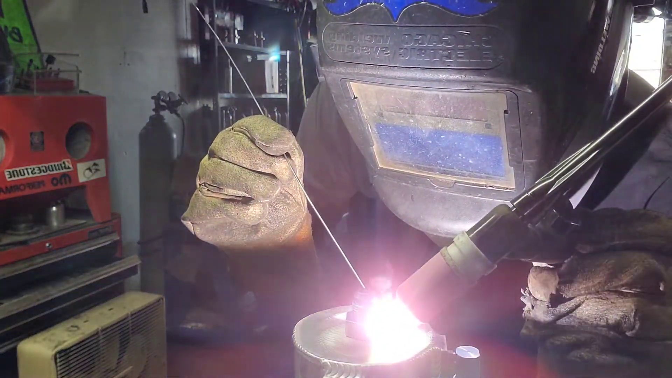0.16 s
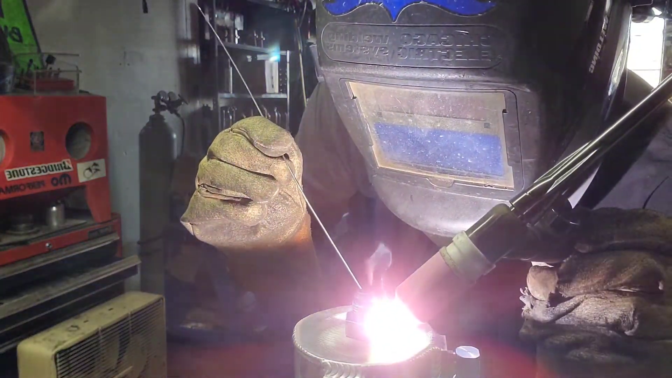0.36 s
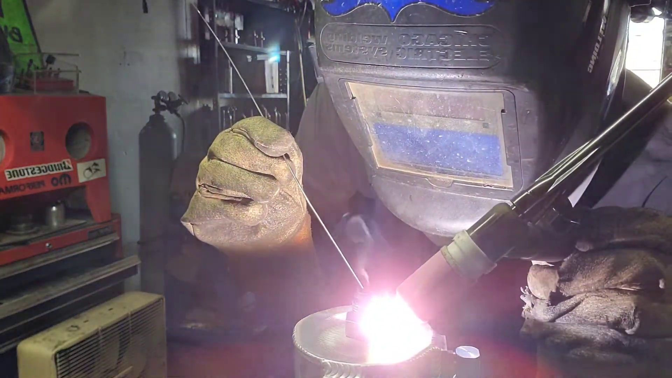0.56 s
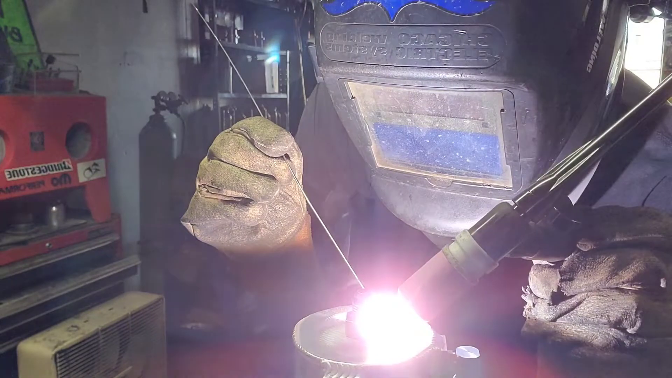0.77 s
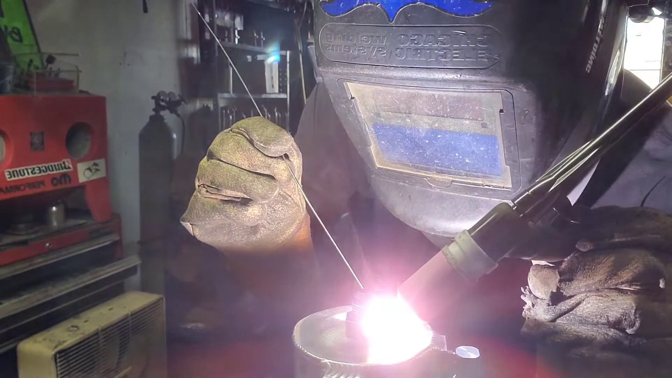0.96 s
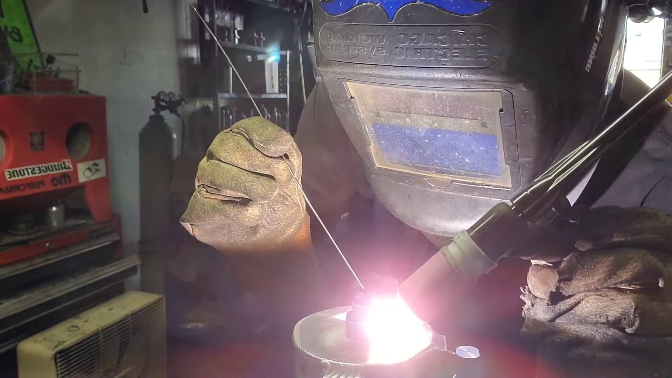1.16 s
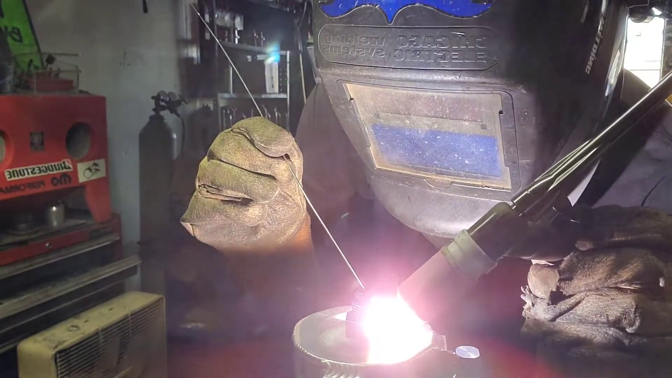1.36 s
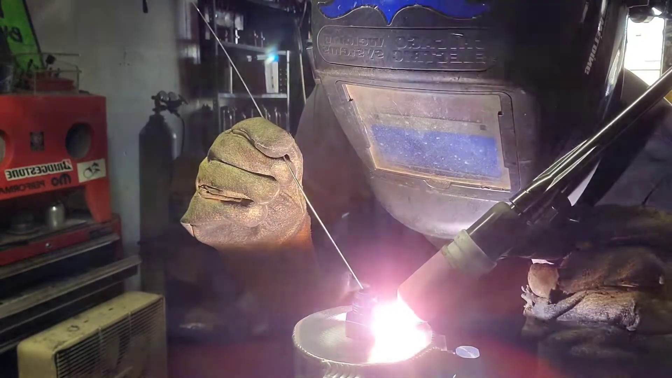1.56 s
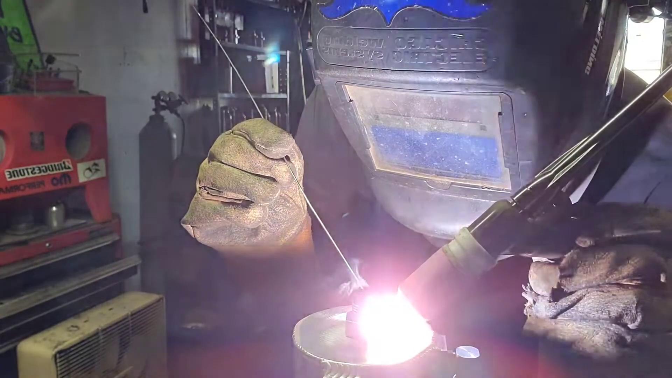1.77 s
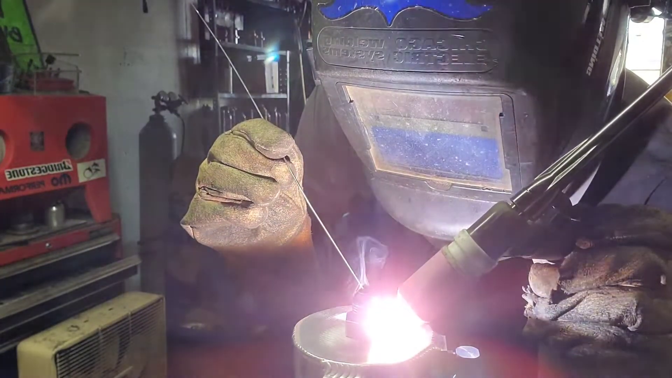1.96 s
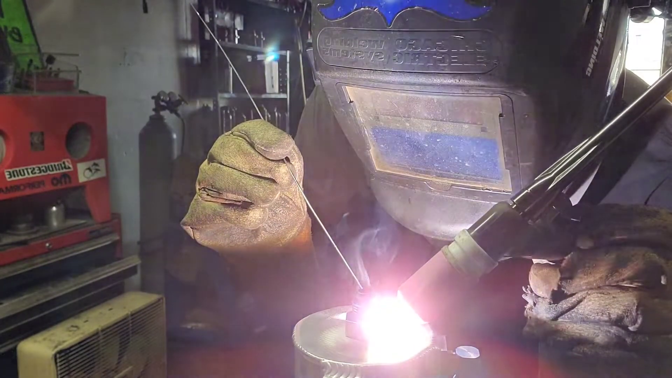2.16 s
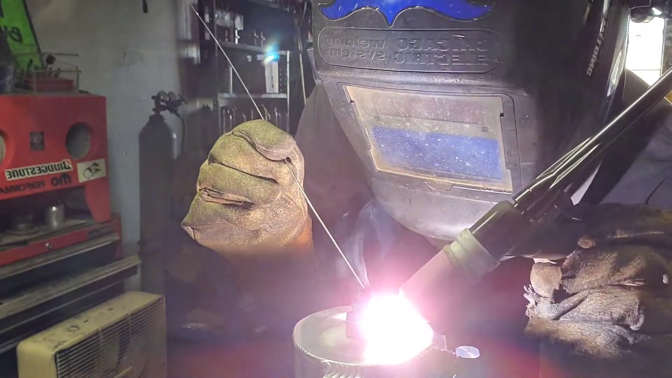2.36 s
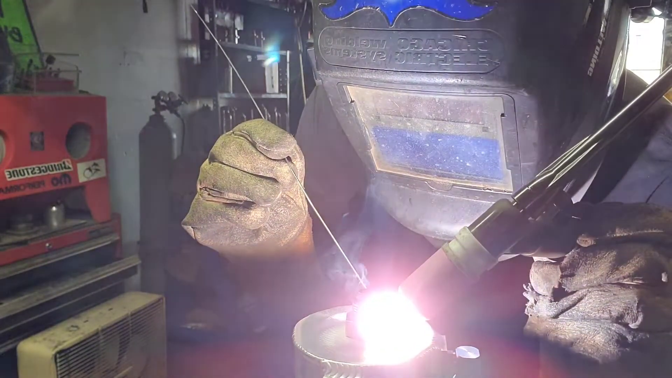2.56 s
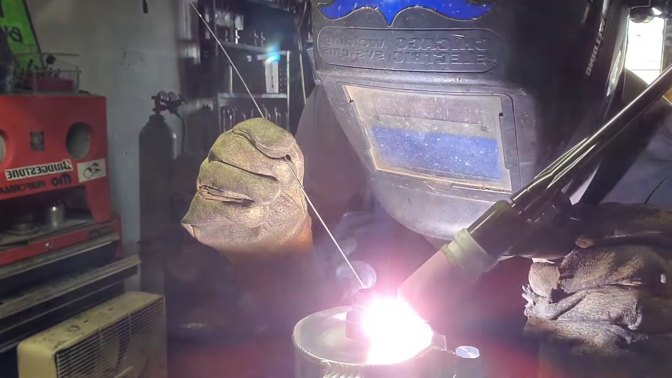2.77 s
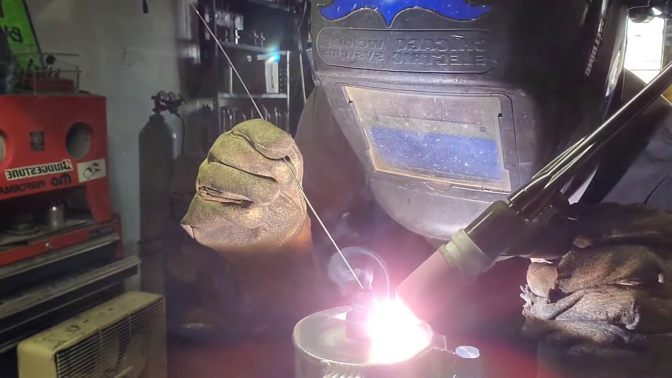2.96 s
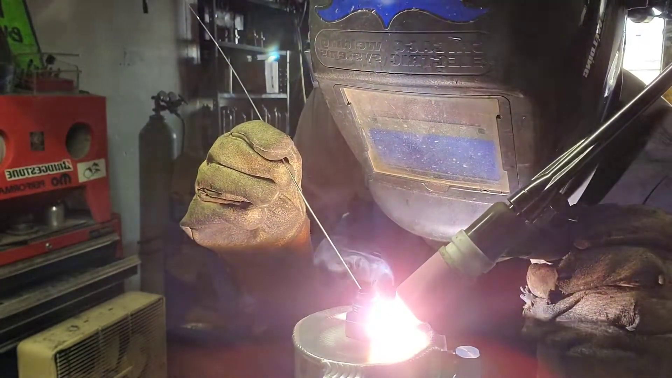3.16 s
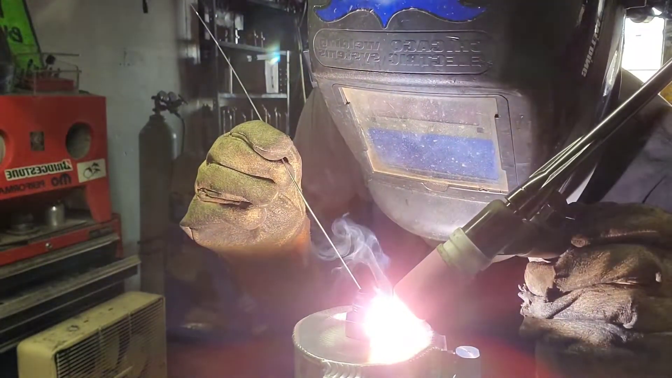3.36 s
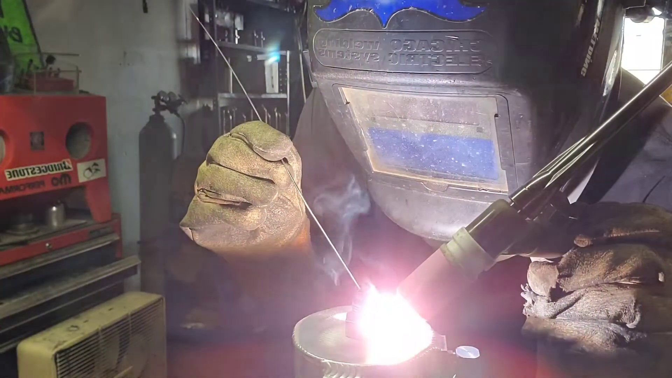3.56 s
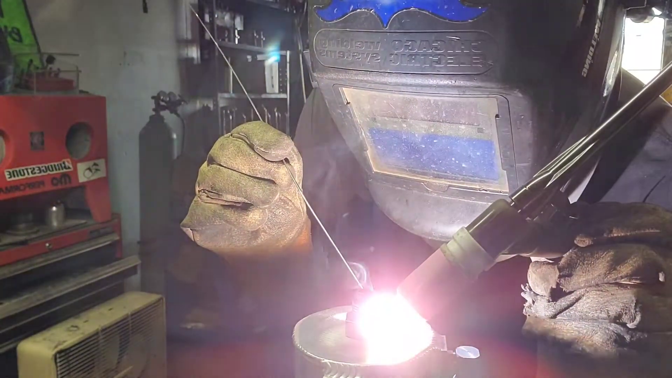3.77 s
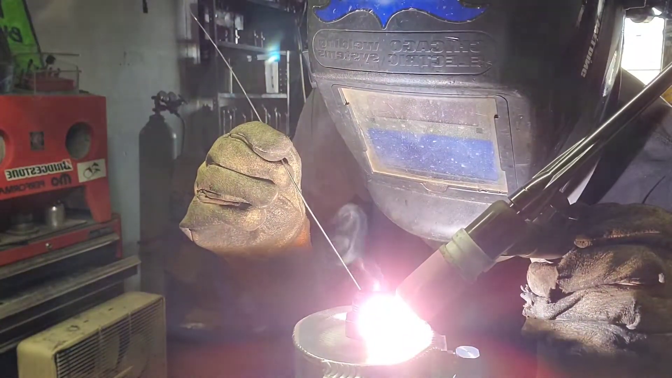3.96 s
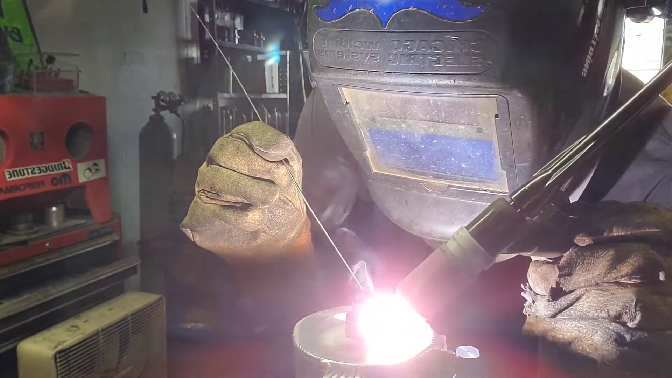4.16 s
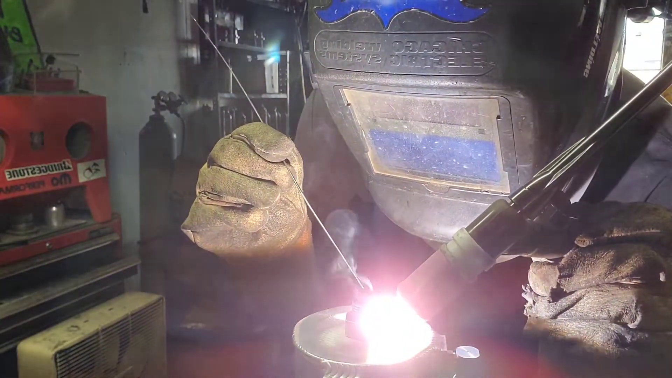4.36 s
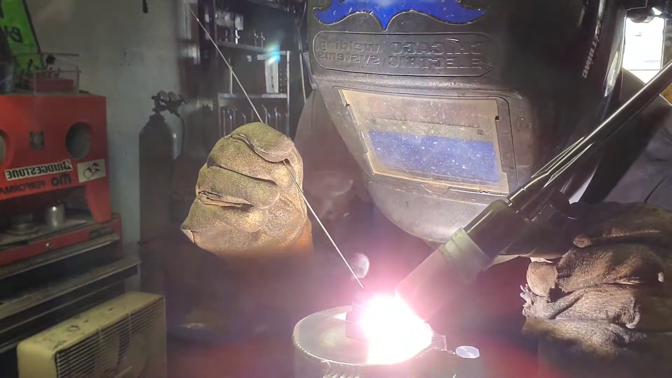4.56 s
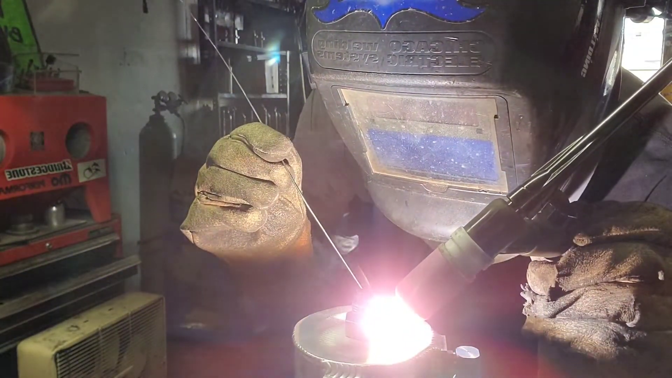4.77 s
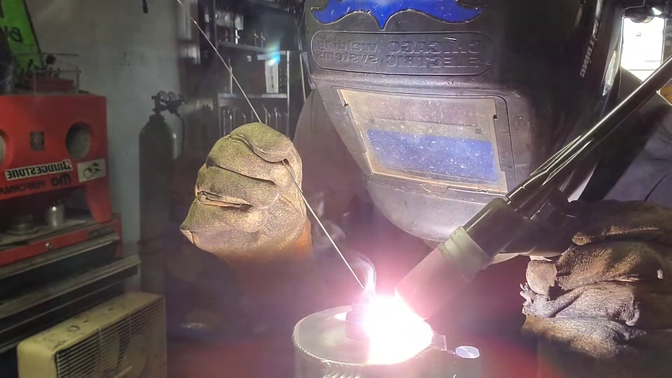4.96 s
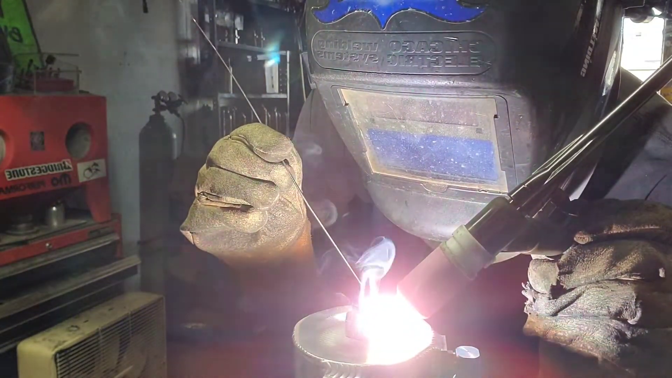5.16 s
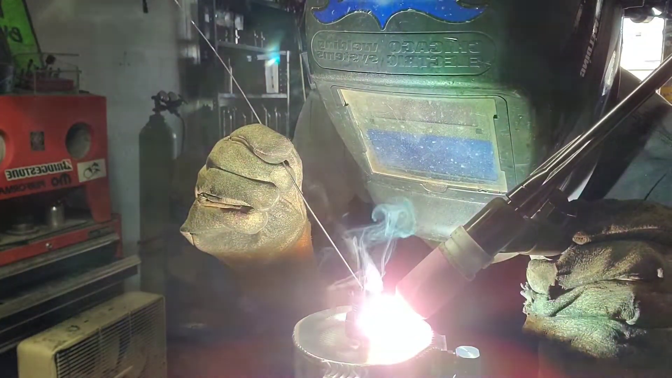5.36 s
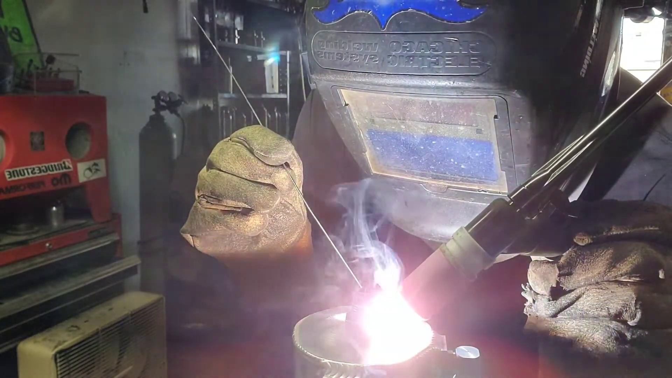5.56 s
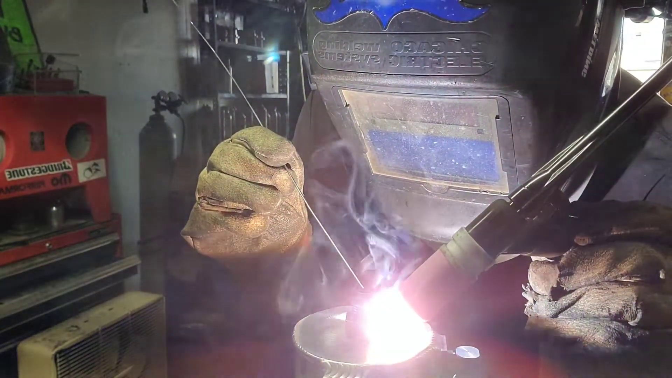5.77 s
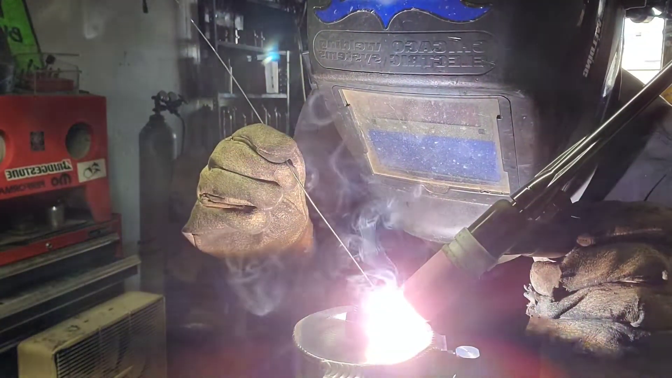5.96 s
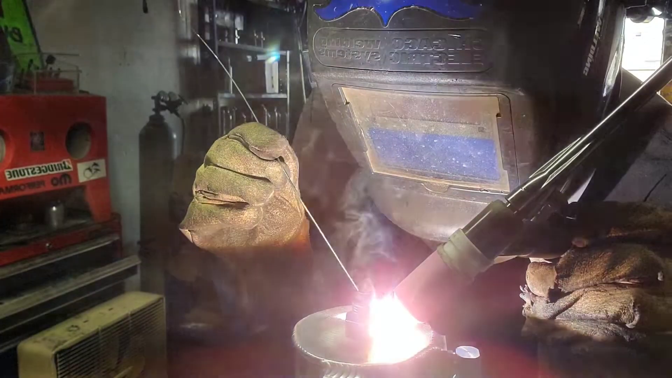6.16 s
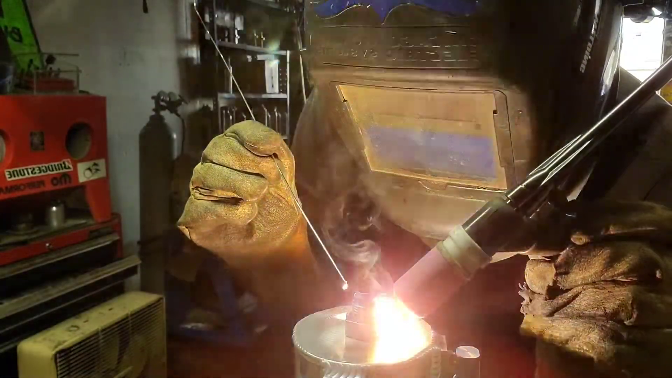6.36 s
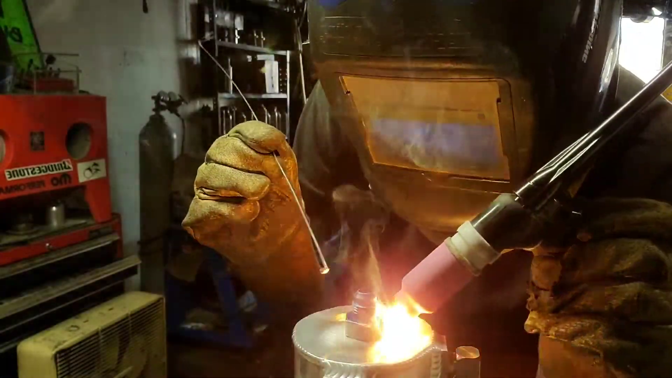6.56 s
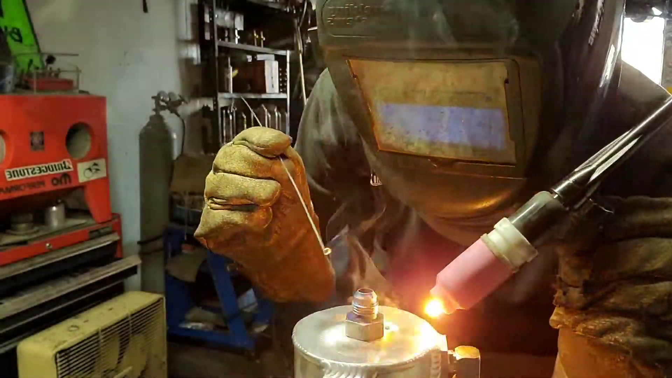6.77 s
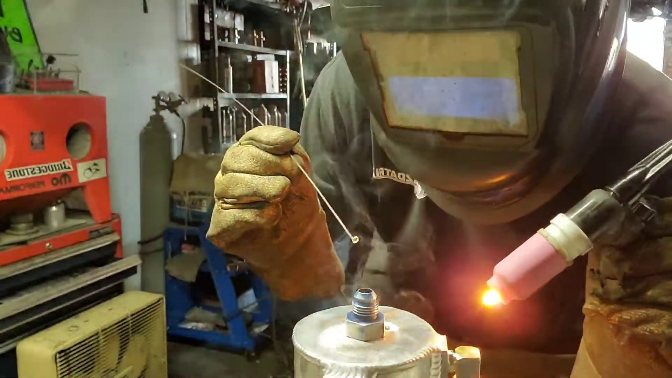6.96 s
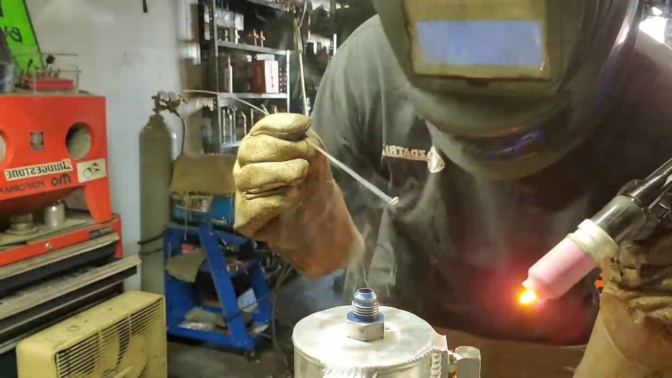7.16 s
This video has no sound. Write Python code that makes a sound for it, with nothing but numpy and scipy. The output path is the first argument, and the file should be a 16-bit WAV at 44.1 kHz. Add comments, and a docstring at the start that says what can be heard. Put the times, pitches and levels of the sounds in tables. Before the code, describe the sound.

Close-up in a small, fairly dry workshop, an electric arc is already buzzing, its even low drone edged with metallic rasp, crisp ticking treble and frying sizzle. Level and tone drift gently, with short dips and flares. After more than five seconds it turns rough and crackly, recovers, then cracks and goes out suddenly. The short echo fades, uncovering faint gas hiss, a soft high whistle and barely audible machine hum.

```python
"""Workshop: an alternating-current TIG arc burns on aluminium while filler rod is fed in.
Each cycle holds two current reversals: one strikes with a tick and a rasp, the other gives a low push.
Filtered pulse trains make ticks, push and clicks; noise bursts at each strike roughen rasp and sizzle.
Late on the arc sputters, cracks as the torch lifts and goes out; filtered-noise gas, a faint whistle
and a hum of sines remain."""
import sys
import numpy as np
from scipy import signal
from scipy.fft import rfft, irfft, next_fast_len
from scipy.io import wavfile
from scipy.ndimage import uniform_filter1d

SR = 44100
rng = np.random.default_rng(int(sys.argv[2]) if len(sys.argv) > 2 else 0)


def wav_out(sig):
    """Save sig, one row per channel (or a flat mono array), as 16-bit PCM at SR to the path in sys.argv[1]."""
    wavfile.write(sys.argv[1], SR, np.round(np.clip(np.atleast_2d(sig).T, -1, 1) * 32767).astype(np.int16))


N = 317949
TIME = np.arange(N) / SR  # s
BINS_HZ = np.fft.rfftfreq(4096, 1 / SR)

ARC_HZ, FIRST_STRIKE_S, ARC_OUT_S = 130.329, 0.00395, 6.453
PUSH_LAG_S = 0.00232  # strike to opposite reversal
RASP_LEAD_S = 0.00069  # current collapses just before each strike
PUSH_RING_HZ, RASP_RING_HZ = (375, 22), (1400, 150)  # all-pass centre, width
LIFT_S, LIFT_RISE_S, LIFT_FALL_S, LIFT_DB = 6.428, 0.05, 0.028, 8.5  # arc stretches as torch lifts
WANDER_PER_S = 14  # random gain steps per second
CLICK_DB, CLICK_ECHO_DB, BURST_DB, BURST_ECHO_DB = -4, -2.5, -10, -8.5  # sizzle mix, before trim
SHIMMER_DB, SHIMMER_HZ, SHIMMER_S = 1.5, 170, 0.1  # depth, smoothing width, smoothing length
CRACK_NEAR_DB, CRACK_FAR_DB = -14, -8  # echo mix
BODY_ROOM_DB, TREBLE_ROOM_DB = -17.5, -11  # room sends
BASS_SIDE_DB = -13  # side noise relative to mid
GAS_DB, MOTOR_HZ, MOTOR_DB = -51, 120, -83
PORT_LAG_SAMPLES = 3  # right after left
EDGE_HZ = 15620

# Burning arc, drifting as the torch travels: t/s, relative buzz, sizzle, tick level/dB
ARC_LEVELS = [(0.0, -38, -44.5, -27), (0.3, -42, -42.5, -27), (0.582, -36, -41.5, -26),
              (0.784, -35.5, -39, -27), (1.452, -37.5, -42, -27), (1.85, -40, -42, -25.7),
              (2.499, -41.5, -39.5, -26.5), (2.648, -35.5, -39.5, -25.5), (3.081, -41, -39, -25.5),
              (3.275, -44.5, -44, -28.5), (3.719, -40.5, -38, -24.5), (4.179, -36, -41.5, -27.5),
              (4.623, -37.5, -40.5, -26), (5.18, -36.5, -40, -25), (5.56, -38.5, -39, -26),
              (5.72, -44, -37, -27), (5.855, -45, -37, -26.5), (5.93, -45, -40.5, -29.5),
              (6.017, -38.5, -40.5, -26.5), (6.3, -42.5, -42.5, -27.5), (6.45, -40, -40.5, -28.5)]
# Plasma restlessness: t/s, relative flutter level/dB
FLUTTER_LEVELS = [(0.0, -74), (3.17, -74), (3.3, -70.5), (3.42, -72.5), (5.25, -75.5), (5.7, -66.5),
                  (5.92, -62.5), (5.99, -73), (6.33, -82), (6.44, -67)]
# Runs of hard re-ignitions: start t/s, end t/s, first and last level/dB before trim, treble shelf/dB
SPUTTER_RUNS = [(5.632, 5.716, -30, -29, 15), (5.716, 5.740, -30, -29, 3), (5.770, 5.776, -23, -29, 16),
                (5.796, 5.832, -28, -28, 3), (5.839, 5.855, -31.5, -27, 27), (5.862, 5.885, -23, -34, 28),
                (5.885, 5.908, -30, -28, 8), (5.908, 5.916, -25, -26, 3), (5.913, 5.931, -28, -34, 7),
                (6.353, 6.391, -30, -37, 15), (6.391, 6.428, -46, -26, -15), (6.430, 6.456, -28, -32, -18)]
# Stalls weaken the regular strikes (negative: strengthen): start t/s, end t/s, full depth/dB
STALL_SPANS = [(5.71, 5.740, 2.5), (5.740, 5.771, 5), (5.772, 5.794, 9), (5.8, 5.863, 3),
               (5.863, 5.935, -1.5)]
# Push overtones: multiple of arc rate, relative level/dB
PUSH_OVERTONES = [(1, -25), (2, -8), (3, -9.5), (4, -9), (5, 1.67), (6, -6.5), (7, -8.5), (8, -9.5),
                  (9, -15), (11, -37), (16, -31.5)]
# Rasp overtones: multiple of arc rate, relative level/dB
RASP_OVERTONES = [(1, -64), (9, -17), (10, -4), (11, 5.5), (12, 2), (13, 5.5), (14, 3.5), (15, -9.5),
                  (17, -17.5), (34, -34.5)]
# Buzz phase lead, left over right: multiple of arc rate, phase/rad
BUZZ_LEADS = [(2, 0), (3, 0.45), (4, 0.1), (6, 0.46), (7, 2.04), (8, 0.11), (9, 1.54), (10, 0), (14, 0.68)]
# Tick spectrum: f/Hz, relative level/dB
TICK_SPECTRUM = [(100, -114), (6000, -22), (8200, -33), (8900, -11.5), (9900, -4.5), (10500, -12),
                 (11100, -1.5), (11500, -2), (12000, 6), (13000, -3.5), (13500, 3.5), (13900, -2),
                 (14800, -8), (15200, 4), (15700, -1)]
# Oxide click spectrum: f/Hz, relative level/dB
CLICK_SPECTRUM = [(100, -45.5), (1400, -7), (2100, -3), (2550, 5), (2950, -1), (3400, 0.5), (3750, -2.5),
                  (4200, 3.5), (4650, -3), (5300, 3), (7200, 3), (8200, 1), (9800, 7), (15300, -3)]
# Sizzle burst spectrum: f/Hz, relative level/dB
BURST_SPECTRUM = [(100, -67), (1400, -24), (2000, 4), (2500, 5.5), (3400, 1.5), (4650, 4.5), (5400, 8),
                  (7200, 3.5), (8200, 2), (9800, -1), (12000, -30), (15300, -18)]
# Re-ignition crack spectrum: f/Hz, relative level/dB
CRACK_SPECTRUM = [(30, -26), (100, -29), (250, -13), (650, -0.5), (1100, -9.5), (1600, 6.5), (2600, 1.5),
                  (3600, -2.5), (5500, -2), (8500, -2), (12000, 4), (15500, 1)]
# Plasma flutter spectrum: f/Hz, relative level/dB
PLASMA_SPECTRUM = [(20, -10), (80, 0.5), (130, 1), (190, -3.5), (330, 0), (460, -5.5), (680, 3.5),
                   (1000, -3.5), (1400, 4.5), (3000, -11.5)]
# Shielding gas spectrum: f/Hz, relative level/dB
GAS_SPECTRUM = [(140, -34), (350, -43), (520, -32), (950, -16.5), (1250, -27), (1500, -3), (2850, -13.5),
                (3600, -5.5), (4100, -15), (4800, -18.5), (5800, -8.5), (7200, -10), (9500, -19),
                (15500, -11.5)]
# Shop rumble spectrum: f/Hz, relative level/dB
RUMBLE_SPECTRUM = [(20, -19), (45, 8), (90, -3), (130, -21), (200, -13), (330, -35), (600, -39)]
# Gas resonances in the torch cup: f/Hz, half-width to -6 dB/Hz, level/dB
CUP_RESONANCES = [(1540, 320, -66.5), (2334, 47, -58.5), (2540, 53, -63), (2670, 180, -58),
                  (3280, 140, -65), (5800, 210, -84)]
# Machine hum: t/s, level/dB before trim
HUM_LEVELS = [(0.0, -75), (0.58, -60.5), (2.15, -56), (2.63, -72), (3.07, -58), (4.37, -68.5), (4.99, -89),
              (5.92, -66.5), (6.06, -70), (6.44, -71), (7.04, -86), (7.2, -74)]
# Machine hum tones: f/Hz, relative level/dB
HUM_TONES = [(64.8, 3), (129.4, -6), (194, -36)]
# Workshop decay: f/Hz, T60/s
ROOM_DECAY = [(100, 0.062), (600, 0.36), (2000, 0.34), (8000, 0.12), (15000, 0.022)]
# Tick tilt, left minus right, before trim: f/Hz, relative level/dB
TICK_TILT = [(7500, -4.5), (8900, 4), (9900, 1.5), (11300, -13), (12100, 3), (12800, -18.5), (14200, 15),
             (15200, 0.5)]
# Gas jet whistle, end values held outside: t/s, f/Hz, level/dB
WHISTLE_GLIDE = [(6.45, 6350, -66), (6.699, 6600, -67), (6.85, 6960, -60), (7.05, 6940, -59),
                 (7.2, 6700, -68)]
# Soft puffs as the arc lurches: onset t/s, envelope peak/dB, f/Hz
PUFF_EVENTS = [(1.15, -54, 170), (1.575, -51, 191), (3.57, -48, 75), (4.945, -57, 180), (5.514, -48, 200),
               (5.702, -52, 119), (5.726, -49, 85), (5.766, -47, 80), (5.795, -50, 85), (5.827, -51, 75),
               (5.866, -48, 85), (5.908, -50, 108)]
# Arc choked, as when the rod dips into the pool (negative: a rise), depth scaled per layer:
# t/s, depth/dB, closing/s, recovery/s
ROD_DIPS = [(0.741, 3, 0.021, 0.0098), (1.622, 6.5, 0.037, 0.071), (2.136, 5.5, 0.061, 0.031),
            (3.152, 2.5, 0.061, 0.029), (4.987, 3, 0.036, 0.068), (5.753, -0.5, 0.019, 0.035),
            (6.295, 3.5, 0.2, 0.063)]
# Flares as the arc meets oxide or stretches, rise scaled per layer: t/s, rise/dB, half-length/s
ARC_FLARES = [(1.126, 2, 0.016), (1.505, 1.8, 0.085), (1.943, 1.5, 0.042), (3.288, 4, 0.064),
              (3.838, 1.5, 0.04), (5.112, 1.5, 0.096), (5.346, 2.5, 0.067), (5.55, 2, 0.032),
              (6.155, 3.5, 0.045), (6.417, 0.5, 0.056)]


def amp(db):
    """Decibels to gain."""
    return 10 ** (np.asarray(db) / 20)


def evened(x):
    """Scale to rms 1."""
    return x / np.sqrt(np.mean(x ** 2) + 1e-20)


def read(points, hz):
    """Interpolate a table on a log-frequency axis."""
    f, value = np.transpose(points)
    return np.interp(np.log(hz + 1), np.log(f + 1), value)


def follow(rows, axis=1):
    """Gain over time from one dB column."""
    rows = np.asarray(rows)
    return amp(np.interp(TIME, rows[:, 0], rows[:, axis]))


def convolve(x, response):
    """Convolve with one or two responses, cut to N."""
    return signal.oaconvolve(np.atleast_2d(x), np.atleast_2d(response), axes=1)[:, :N]


def colour(x, db):
    """Minimum-phase filter of unit energy, shaped by dB at BINS_HZ."""
    log_gain = np.log(amp(np.concatenate([db, db[-2:0:-1]])))
    response = np.fft.ifft(np.exp(np.conj(signal.hilbert(log_gain)))).real
    return convolve(x, response / np.linalg.norm(response))


def pulses(times, sizes, order=12):
    """Windowed sincs at sub-sample times; size 1 at the arc rate gives rms 1."""
    at = times[:, None] * SR
    index = at.astype(int) + np.arange(-order, order + 1)
    window = np.cos(np.pi * (index - at) / (2 * order + 2)) ** 2
    shape = np.sinc(index - at) * window
    slots = np.clip(index, 0, N - 1).ravel()
    return np.bincount(slots, (sizes[:, None] * shape).ravel(), N) * np.sqrt(SR / ARC_HZ)


def reversals(lag_s, spread_db, jitter_us, upset=0.2):
    """One pulse a cycle; size and timing scatter scale with plasma flutter."""
    times = np.arange(FIRST_STRIKE_S, ARC_OUT_S, 1 / ARC_HZ) + lag_s
    s, db = np.transpose(FLUTTER_LEVELS)
    scatter = amp(upset * np.interp(times, s, db - db[0]))
    size, shift = rng.standard_normal((len(times), 2)).T * scatter
    return evened(pulses(times + jitter_us * 1e-6 * shift, amp(spread_db * size)))


def scour(steady, burst_s):
    """Noise that flares just after every strike and decays over burst_s."""
    age = (TIME - FIRST_STRIKE_S) % (1 / ARC_HZ)
    envelope = steady + np.exp(-age / burst_s)
    return evened(envelope * rng.standard_normal(N) * (TIME < ARC_OUT_S))


def swell(s, rise_s, fall_s):
    """Gaussian-sided bump of height 1 at s."""
    return np.exp(-((TIME - s) / np.where(TIME < s, rise_s, fall_s)) ** 2)


def unrest(dip, flare, wander_db):
    """Layer gain: its share of dips and flares, plus random wavering."""
    choked = sum(db * swell(s, closing, recovery) for s, db, closing, recovery in ROD_DIPS)
    flared = sum(db * swell(s, length, length) for s, db, length in ARC_FLARES)
    steps = rng.standard_normal(256)
    wander = np.interp(TIME * WANDER_PER_S, np.arange(len(steps)), steps)
    return amp(flare * flared - dip * choked + wander_db * wander)


def stalls(share):
    """Gain of the regular strikes while the arc stalls."""
    depth_db = sum(db * ((TIME > start) & (TIME < end)) for start, end, db in STALL_SPANS)
    return amp(-share * depth_db)


def linger(x, hz, width_hz):
    """All-pass resonance: delays sound near hz without changing its level."""
    r = np.exp(-np.pi * width_hz / SR)
    poles = [1, -2 * r * np.cos(2 * np.pi * hz / SR), r * r]
    return signal.lfilter(poles[::-1], poles, x)


def ports(x):
    """Two channels, right delayed: the arc is heard slightly earlier on the left."""
    x = np.ravel(x)
    return np.array([x, np.pad(x, (PORT_LAG_SAMPLES, 0))[:N]])


def air(side_db):
    """Stereo white noise of a given width, rms 1."""
    mid, side = rng.standard_normal((2, N))
    return evened(np.array([mid + amp(side_db) * side, mid - amp(side_db) * side]))


def bench(x, near_db, far_db, near_t60=0.0012, far_t60=0.11, count=7):
    """Echoes off workpiece (near), helmet and bench (far); patterns crossfade as the torch moves."""
    t = np.arange(SR // 6) / SR
    out = ports(x)
    for k in range(count):
        near, far = rng.standard_normal((2, 2, len(t))) * (t > 0.0003)
        near *= amp(-60 * t / near_t60)
        far *= amp(-60 * t / far_t60) * (rng.random(far.shape) < 0.12)  # sparse
        echoes = (amp(near_db) * evened(near) + amp(far_db) * evened(far)) / np.sqrt(len(t))
        progress = TIME / ARC_OUT_S * (count - 1)
        pose = np.cos(np.pi / 2 * np.clip(progress - k, -1, 1))
        out = out + convolve(x * pose, echoes)
    return out / np.sqrt(1 + amp(near_db) ** 2 + amp(far_db) ** 2)


def shimmer(x, depth_db, patch_hz, patch_s):
    """Smoothed random gain over time and frequency: bright bands come and go."""
    z = signal.stft(x, SR, nperseg=1024)[2]
    field = rng.standard_normal(z.shape)
    for _ in range(2):
        field = uniform_filter1d(field, max(1, round(patch_hz * 1024 / SR)), axis=1)
        field = uniform_filter1d(field, max(1, round(patch_s * SR / 512)), axis=2)
    gain = evened(amp(depth_db * evened(field)))
    return signal.istft(z * gain, SR, nperseg=1024)[1][:, :N]


def standing(x):
    """Standing waves shift each buzz overtone differently between the ears."""
    size = next_fast_len(N + SR)
    lead_rad = read(np.array(BUZZ_LEADS) * [ARC_HZ, 1], np.fft.rfftfreq(size, 1 / SR))
    turn = np.exp(0.5j * lead_rad)
    return irfft(rfft(x, size) * np.array([turn, turn.conj()]), size)[:, :N]


def buzz(rough=0.15):
    """Plasma column swells and shrinks at each reversal: ringing rasp at the strike, push after it."""
    push_db = read(np.array(PUSH_OVERTONES) * [ARC_HZ, 1], BINS_HZ)
    rasp_db = read(np.array(RASP_OVERTONES) * [ARC_HZ, 1], BINS_HZ)
    drift = follow(ARC_LEVELS, axis=1)
    lift = amp(LIFT_DB * swell(LIFT_S, LIFT_RISE_S, LIFT_FALL_S))

    push = colour(reversals(PUSH_LAG_S, spread_db=0.79, jitter_us=4.1, upset=0.31), push_db)
    push = evened(linger(push, *PUSH_RING_HZ))
    push = push * drift / lift * unrest(dip=1.4, flare=0, wander_db=1.12)

    noise = scour(steady=1.0, burst_s=0.0062)
    strike = rough * noise + (1 - rough) * reversals(-RASP_LEAD_S, spread_db=0.3, jitter_us=4.0)
    rasp = colour(strike * stalls(share=0.76), rasp_db)
    rasp = evened(linger(rasp, *RASP_RING_HZ))
    rasp = rasp * evened(drift) * lift * unrest(dip=1.5, flare=0.1, wander_db=1.06) * amp(-41.5)
    return standing(push + rasp) * amp([[0.35], [-0.35]])


def ticks():
    """Each strike snaps brightly, so evenly that the treble is a comb of sharp lines."""
    strike = reversals(0, spread_db=1.0, jitter_us=3.2, upset=0.4)
    snap = colour(strike * stalls(share=0.9), read(TICK_SPECTRUM, BINS_HZ))
    snap = snap * follow(ARC_LEVELS, axis=3) * unrest(dip=0.65, flare=0.7, wander_db=0.5)
    echoed = bench(snap, near_db=2.5, far_db=5.5, near_t60=0.02, count=7)
    left, right = shimmer(echoed, SHIMMER_DB, SHIMMER_HZ, SHIMMER_S)
    lean_db = read(TICK_TILT, BINS_HZ) / 2
    return np.vstack([colour(left, lean_db), colour(right, -lean_db)]) * amp([[3.7], [0.7]])


def sizzle():
    """Each strike scours oxide off the metal: dry click, short noise burst and their echoes."""
    level = follow(ARC_LEVELS, axis=2) * unrest(dip=0.71, flare=1.84, wander_db=0.5)
    strike = reversals(0, spread_db=1.6, jitter_us=3.5)
    click = colour(strike * stalls(share=0.9), read(CLICK_SPECTRUM, BINS_HZ)) * level
    burst = colour(scour(steady=0.16, burst_s=0.00055), read(BURST_SPECTRUM, BINS_HZ)) * level
    echo_feed = amp(CLICK_ECHO_DB) * click + amp(BURST_ECHO_DB) * burst
    scattered = bench(echo_feed, near_db=-6, far_db=14, count=9)
    direct = ports(amp(CLICK_DB) * click + amp(BURST_DB) * burst)
    return (direct + scattered) * amp([[3.6], [4.2]])


def flutter():
    """Restless plasma stirs the air: soft low noise while the arc burns."""
    stir = colour(air(BASS_SIDE_DB) * (TIME < ARC_OUT_S), read(PLASMA_SPECTRUM, BINS_HZ))
    return stir * follow(FLUTTER_LEVELS) * unrest(dip=0.27, flare=1.0, wander_db=4.5) * amp(21.5)


def gas():
    """Shielding gas hisses from the torch cup, with cup resonances, and flows on after the arc."""
    hiss = amp(GAS_DB) * colour(air(side_db=-3.5), read(GAS_SPECTRUM, BINS_HZ))
    for hz, width_hz, db in CUP_RESONANCES:
        band_db = -20 * np.log10(1 + ((BINS_HZ - hz) / width_hz) ** 2)
        hiss = hiss + amp(db) * colour(air(side_db=-5), band_db)
    return hiss


def whistle(width_hz=260):
    """Gas jet whistle: narrow noise on a gliding carrier, strongest once the arc is out."""
    s, hz, db = np.transpose(WHISTLE_GLIDE)
    wobble = colour(air(side_db=0), -20 * np.log10(1 + (BINS_HZ / width_hz) ** 2))
    carrier = np.cos(2 * np.pi * np.cumsum(np.interp(TIME, s, hz)) / SR)
    return evened(wobble * carrier) * amp(np.interp(TIME, s, db))


def machine():
    """Low hum that swells and fades, steady motor tone, shop rumble."""
    lead_cycles = np.array([[0.08], [0]])  # standing waves shift the hum between the ears
    hum = sum(amp(db) * np.sin(2 * np.pi * (hz * TIME + rng.random() + lead_cycles))
              for hz, db in HUM_TONES)
    hum = amp([[-2.3], [-0.7]]) * evened(hum) * follow(HUM_LEVELS)
    motor = amp(MOTOR_DB) * evened(np.sin(2 * np.pi * MOTOR_HZ * TIME))
    rumble = amp(-76) * colour(air(BASS_SIDE_DB), read(RUMBLE_SPECTRUM, BINS_HZ))
    return hum + motor + rumble


def room(x):
    """Workshop tail: decaying noise response, T60 set by frequency."""
    hz, t, z = signal.stft(rng.standard_normal((2, SR // 2)), SR, nperseg=256)
    decay = amp(-60 * t / read(ROOM_DECAY, hz)[:, None])
    tail = signal.istft(z * decay, SR, nperseg=256)[1]
    return convolve(x, tail / np.linalg.norm(tail[0]))


def puffs(peak_s=0.0085):
    """Arc lurches shove the air: brief low sines, envelope peaking peak_s after onset."""
    out = np.zeros(N)
    for s, db, hz in PUFF_EVENTS:
        age = np.maximum(TIME - s, 0)
        envelope = age / peak_s * np.exp(1 - age / peak_s)
        out += amp(db) * envelope * np.sin(2 * np.pi * hz * age)
    return ports(out)


def sputters(treble_hz=4500):
    """Arc nearly dies between cycles and re-ignites with broad, hard cracks."""
    strikes = np.arange(FIRST_STRIKE_S, ARC_OUT_S, 1 / ARC_HZ)
    out = 0
    for start, end, first_db, last_db, treble_db in SPUTTER_RUNS:
        times = strikes[(strikes > start) & (strikes < end)]
        size, late = rng.standard_normal((len(times), 2)).T
        db = np.interp(times, [start, end], [first_db, last_db]) + 0.6 * size
        shelf_db = treble_db * BINS_HZ ** 2 / (BINS_HZ ** 2 + treble_hz ** 2)
        cracks = pulses(times + 0.00003 * late, amp(db))
        out = out + colour(cracks, read(CRACK_SPECTRUM, BINS_HZ) + shelf_db)
    return bench(out, CRACK_NEAR_DB, CRACK_FAR_DB, count=3) * amp([[0.3], [1.5]])


def scene():
    """Arc in its room, over gas and machine."""
    body = buzz() + flutter() + puffs() + sputters()
    treble = ticks() + sizzle()
    tail = room(amp(BODY_ROOM_DB) * body + amp(TREBLE_ROOM_DB) * treble)
    return body + treble + tail + gas() + whistle() + machine()


def record(dry):
    """Band limit: linear-phase low-pass at EDGE_HZ."""
    lowpass = signal.firwin(511, EDGE_HZ, window=("kaiser", 9), fs=SR)
    return signal.oaconvolve(dry, lowpass[None], "same")


dry = scene()
out = record(dry)
wav_out(out)
```